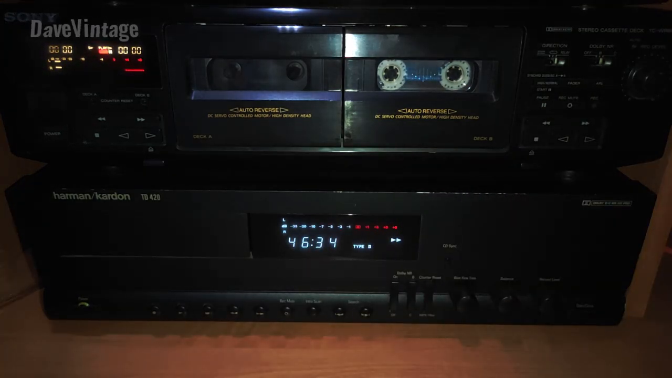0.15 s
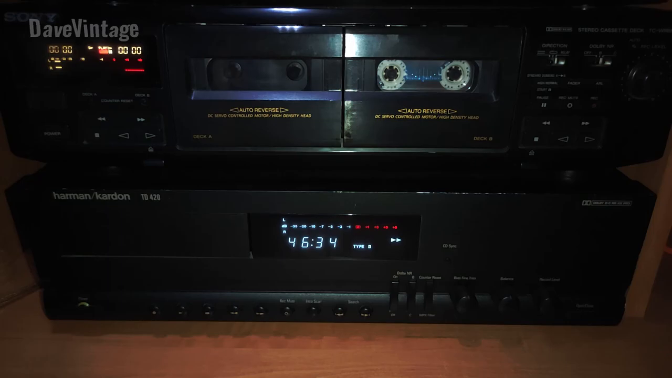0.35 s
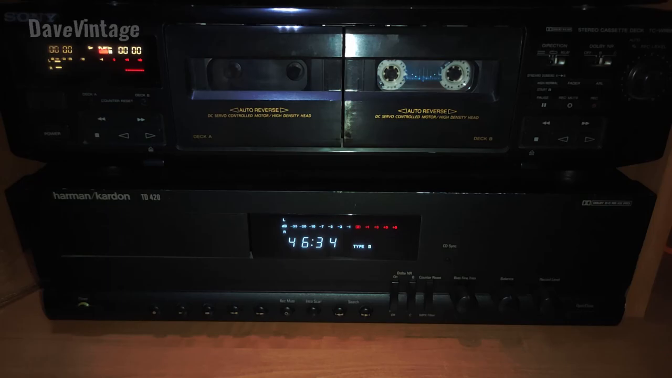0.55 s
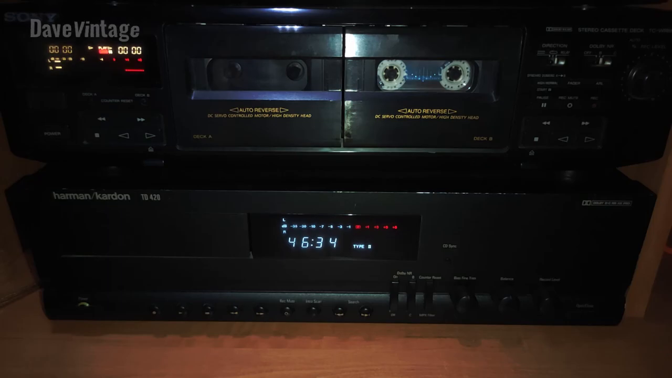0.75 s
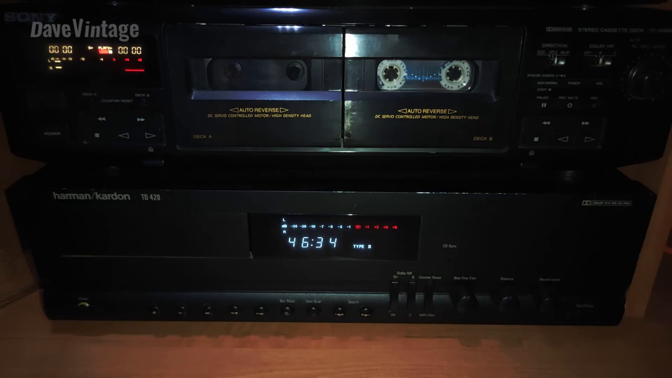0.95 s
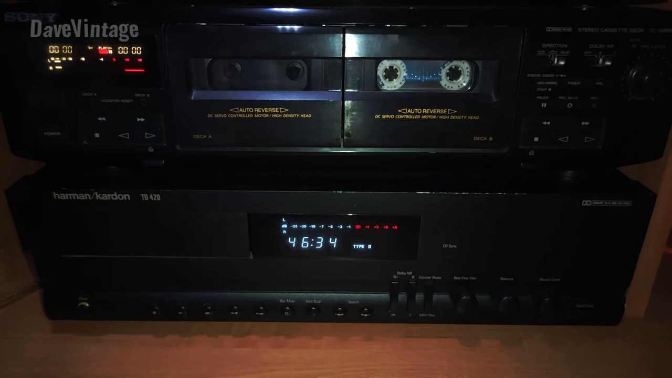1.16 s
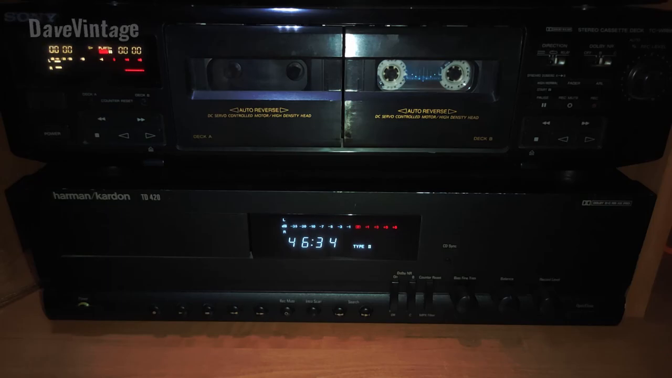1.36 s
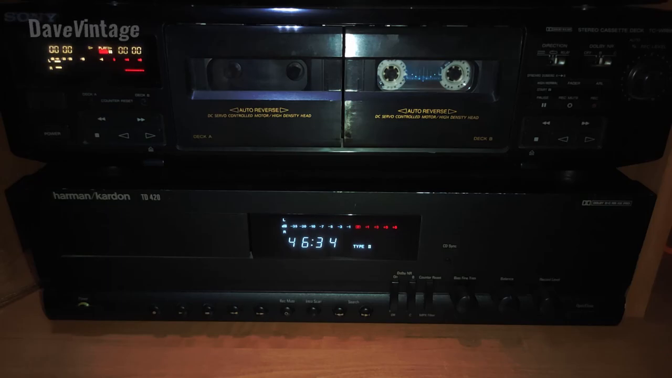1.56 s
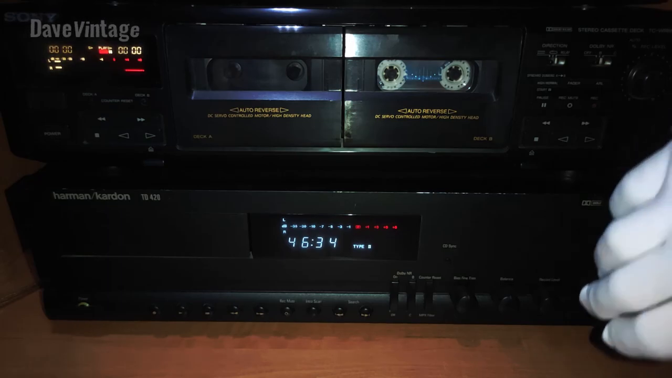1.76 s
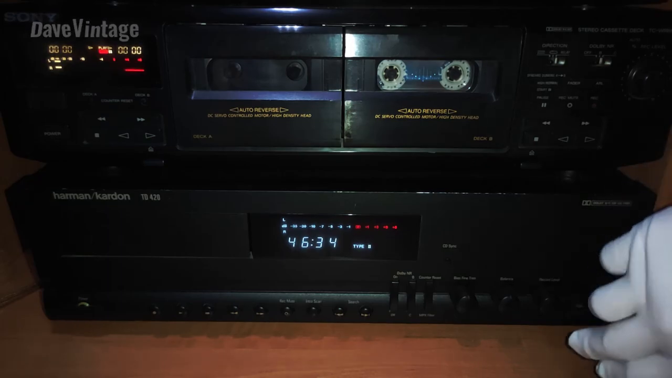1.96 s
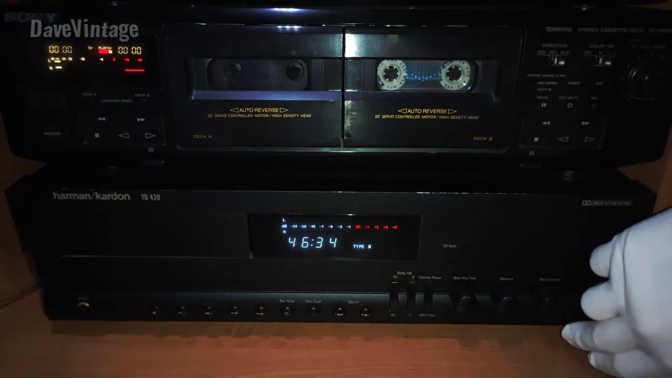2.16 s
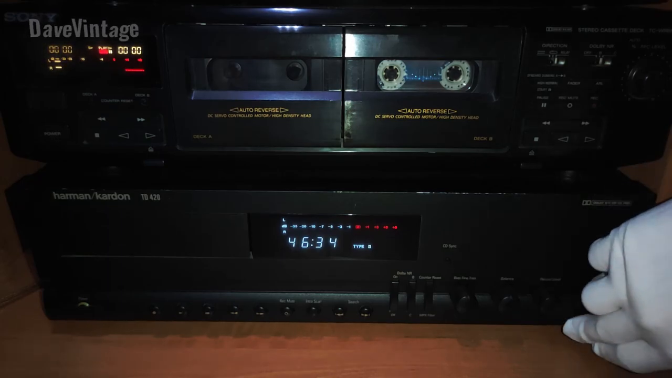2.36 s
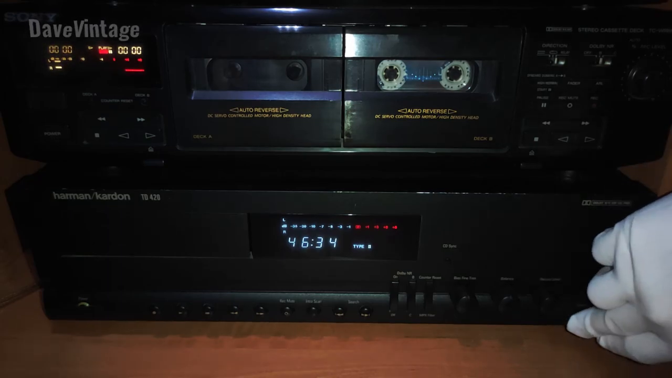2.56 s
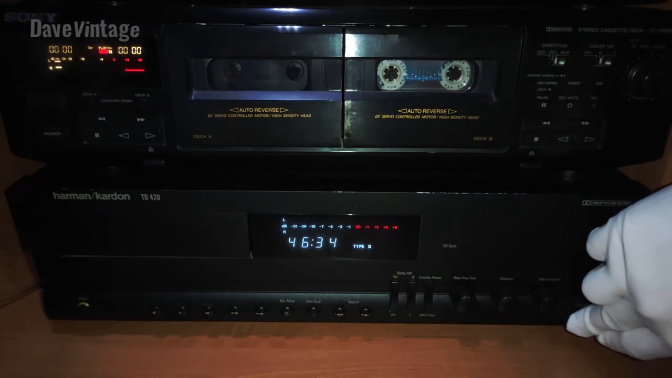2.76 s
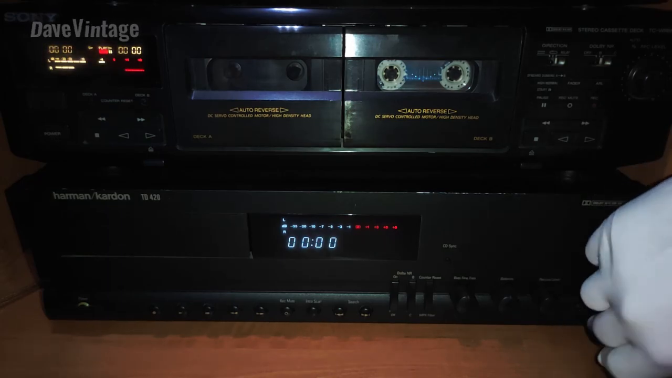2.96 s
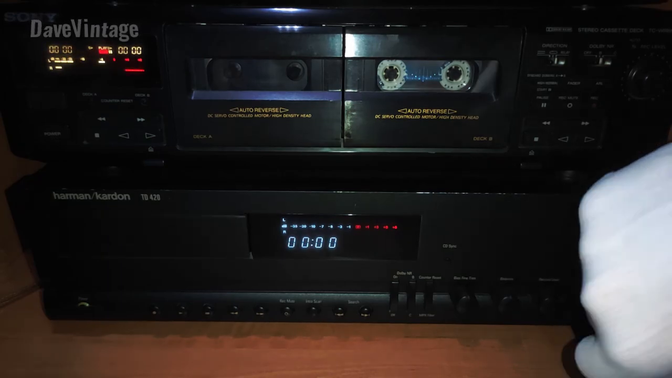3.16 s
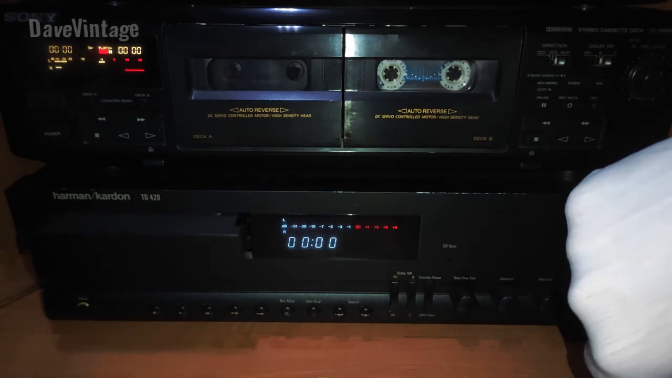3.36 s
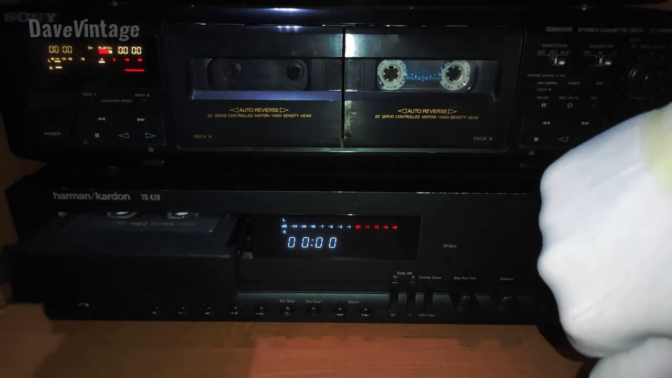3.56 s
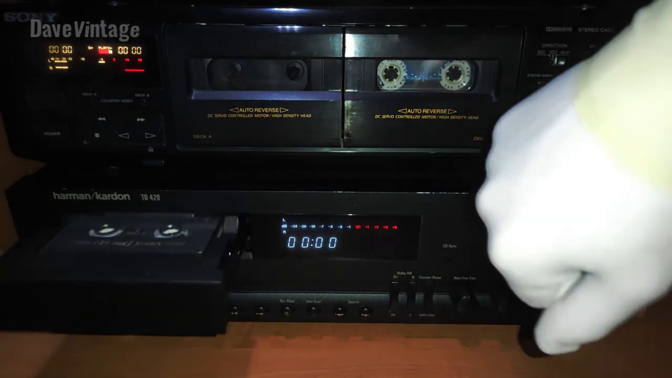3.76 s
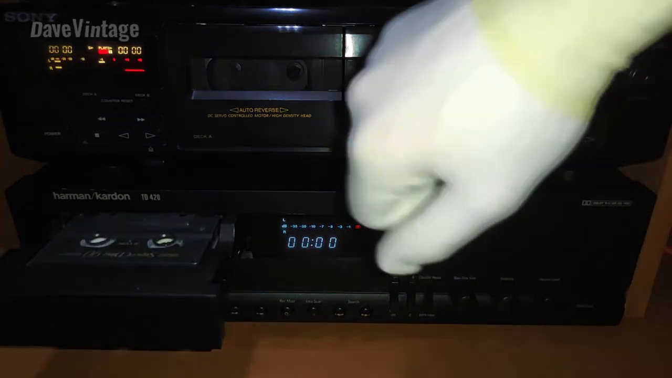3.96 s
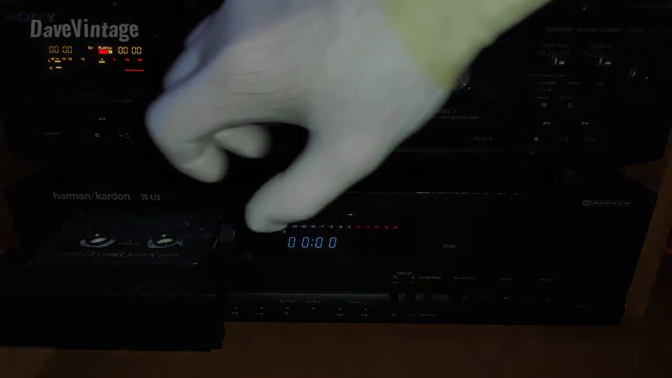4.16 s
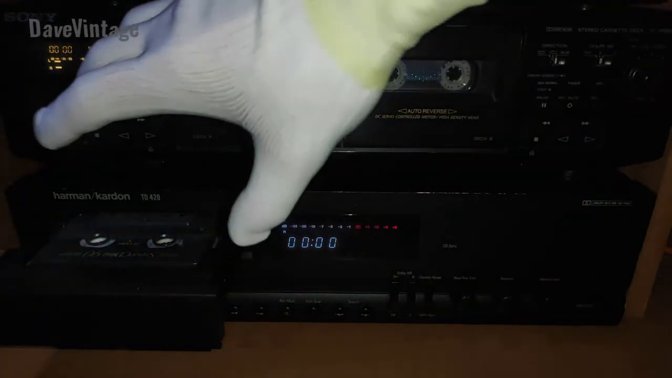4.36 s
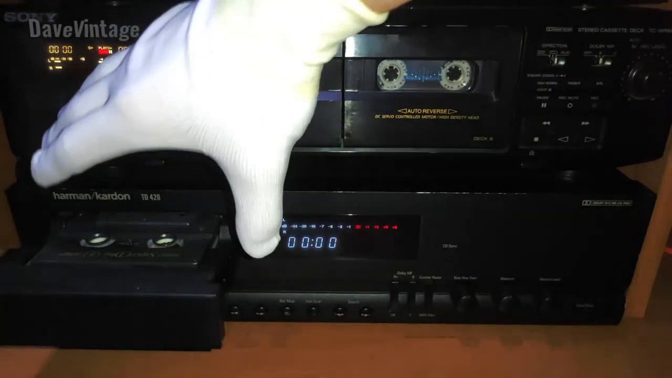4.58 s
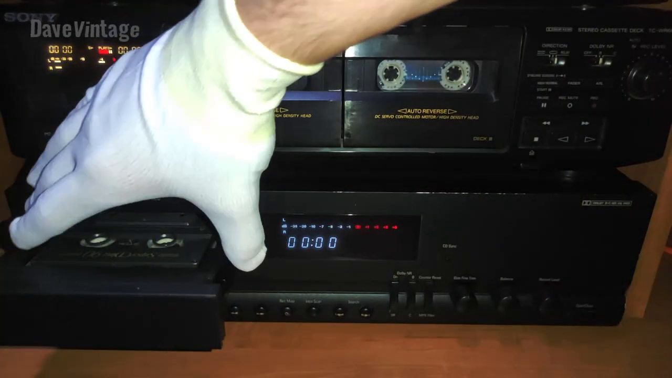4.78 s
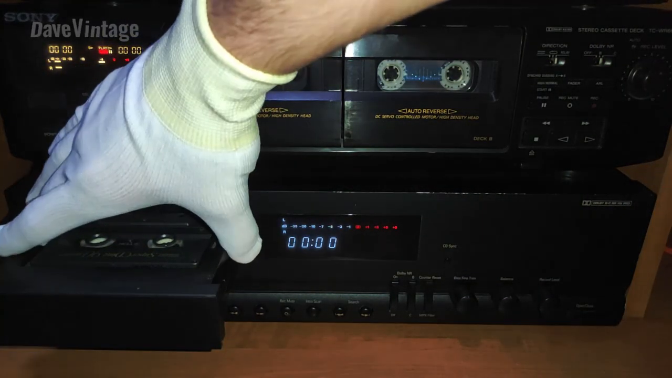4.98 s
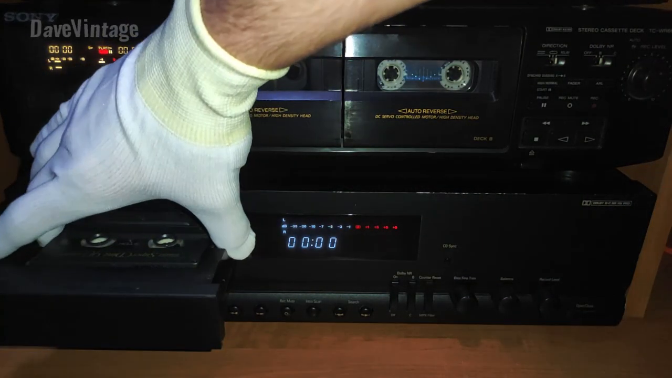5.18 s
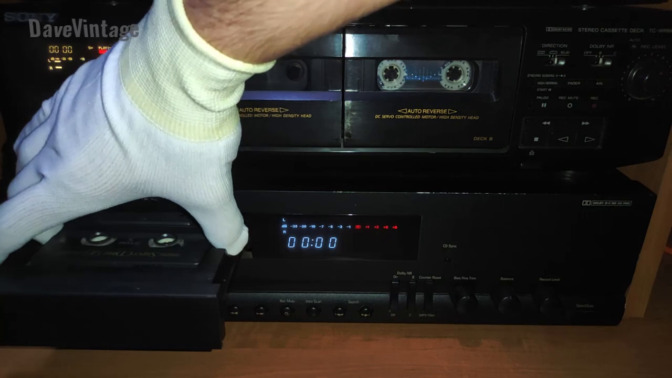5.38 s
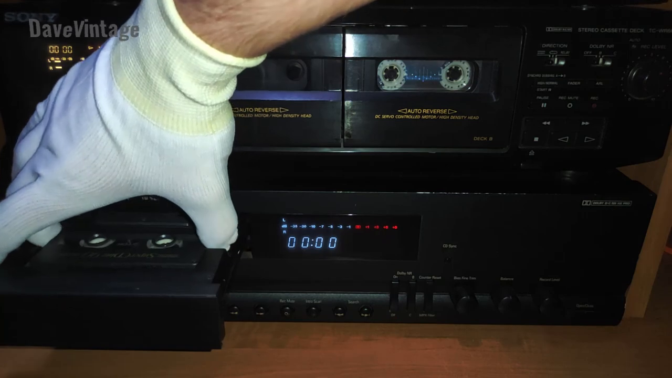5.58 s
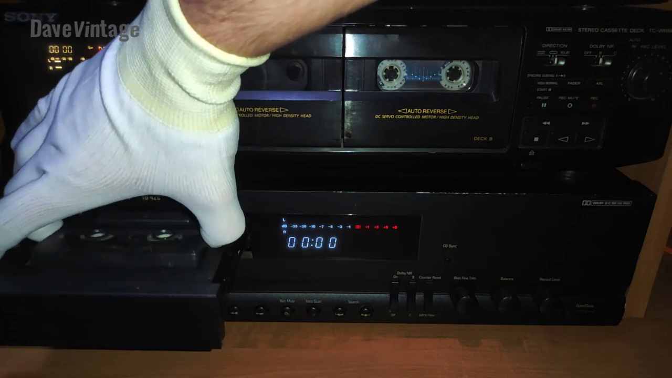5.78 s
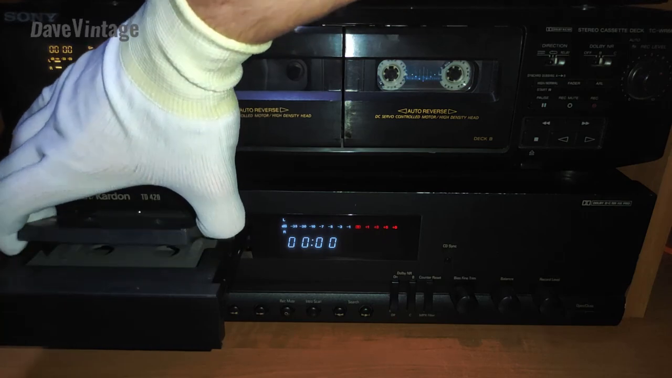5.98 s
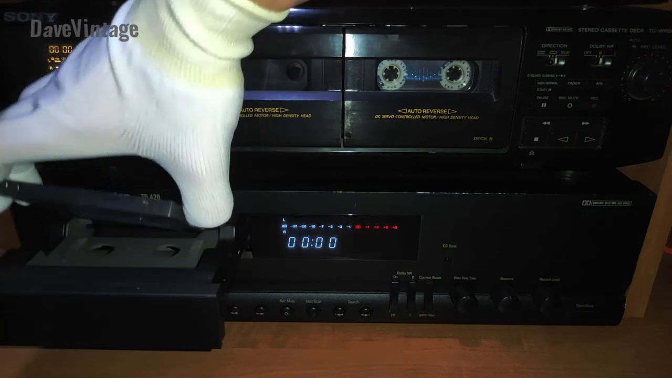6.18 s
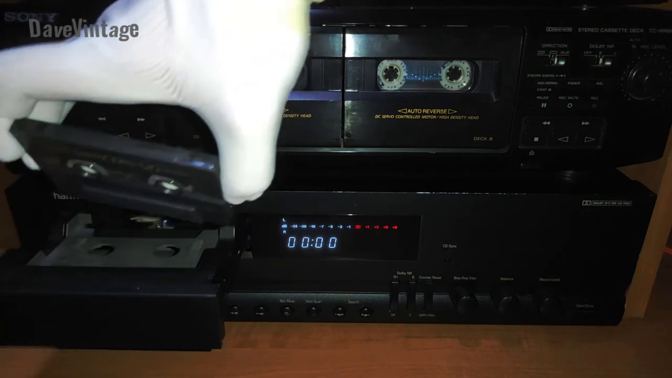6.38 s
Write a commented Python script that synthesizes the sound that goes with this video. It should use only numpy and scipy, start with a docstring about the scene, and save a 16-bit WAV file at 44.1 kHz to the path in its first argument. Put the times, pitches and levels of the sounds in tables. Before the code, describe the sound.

A key click and a short geared whir open a tape deck's tray, followed by glove rustle and the clatter of a cassette being removed.

```python
"""A quiet room hums with a fan and mains, close to a phone-like microphone pair. A tape deck's
mechanism ticks as it settles, and a glove and sleeve start to rustle. Near 3 s a finger presses a key,
the latch springs open and a small geared motor drives the tray out until it hits its stop at 4 s.
Fingertips nudge the cassette and tap the hollow tray; from 5.7 s the hand lifts the cassette out,
scraping and clicking in its clips and knocking against the well."""
import sys
import numpy as np
from scipy import signal
from scipy.fft import rfft, irfft, next_fast_len
from scipy.io import wavfile
from scipy.ndimage import uniform_filter1d

SR = 44100
rng = np.random.default_rng(int(sys.argv[2]) if len(sys.argv) > 2 else 0)


def dump(signal):
    """Clip the signal to [-1, 1] and save it as 16-bit WAV at the path in sys.argv[1]."""
    limited = np.clip(np.atleast_2d(signal).T, -1, 1)
    pcm = np.round(limited * 32767).astype(np.int16)
    wavfile.write(sys.argv[1], SR, pcm)


N = 283589
T = np.arange(N) / SR

# The fan's resonances: pitch_hz, width_hz, level_db
FAN_DRONE = [(709, 20, -74.5), (814, 94, -76), (966, 61, -74), (1106, 29, -75), (1171, 5.8, -71.5),
             (1250, 17, -83.5), (1290, 100, -68), (1411, 16, -75), (1792, 29, -73.5), (5260, 230, -79.5)]
# Mains hum: pitch_hz, steady_db, opening_offset_db, offset_fade_s
MAINS_HUM = [(50.4, -62.5, 6.5, 1.4), (92.3, -66, -1.5, 1.4), (152.5, -73.5, 6.5, 1.58)]
# Glove and sleeve fader: time_s, level_db
RUSTLE_FADER = [(.9, -87), (1.4, -67.5), (1.7, -63.5), (1.95, -71), (2.2, -66.5), (2.8, -71.5), (4.0, -57),
                (4.06, -58), (4.2, -64.5), (4.33, -60.5), (4.4, -58), (4.7, -53), (5.0, -52.5),
                (5.15, -57.5), (5.33, -60.5), (5.47, -59), (5.55, -59.5), (5.9, -61), (6.17, -48.5),
                (6.24, -65), (6.43, -58)]
# Motor faders: time_s, drive_db, rail_hiss_db
MOTOR_FADERS = [(2.9, -62.5, -86), (2.98, -40.5, -52), (3.05, -54, -53), (3.25, -52.5, -66),
                (3.33, -46, -54.5), (3.6, -45, -55.5), (3.65, -45, -50.5), (3.72, -46, -53),
                (3.85, -47.5, -54.5), (4.022, -45.5, -53.5), (4.1, -66.5, -75)]
# Tones of the running drive: pitch_hz, gain_db
WHINE_TONES = [(153, -1), (250, 0.5), (484, 8.5), (699, 10), (939, 7.5), (1012, 5.5), (1102, 3),
               (1366, 4.5), (1990, -6), (2128, -10)]

# Hit cues (positive pan is left): start_s, tick_db, body_db, thud_db, rattle_t60_s, pan_db
SETTLING_HITS = [(0.7738, -56, -53, -64, 0.13, -5), (0.7856, -42.5, -46.5, -61, 0.1, -9.5),
                 (0.7951, -47, -41.5, -62, 0.068, 7), (0.806, -60, -46.5, -64, 0.042, -10),
                 (0.8188, -57, -50.5, -55, 0.15, 1), (0.8891, -58.5, -57, -76, 0.12, -4),
                 (1.259, -52, -57, -66, 0.057, -2.5), (1.649, -50.5, -60, -63, 0.099, 2),
                 (2.503, -55.5, -62, -62.5, 0.088, 1)]
KEY_HITS = [(2.837, -44.5, -35, -66, 0.025, -1), (2.8434, -45.5, -37, -61, 0.02, -2),
            (2.8497, -58, -45, -55, 0.032, -5), (2.8567, -56, -47, -60, 0.035, 6)]
LATCH_HITS = [(2.916, -72, -67, -50, 0.1, 0), (2.9295, -72, -60, -54, 0.053, -6),
              (2.9447, -56.5, -75, -47.5, 0.37, -6), (2.9677, -51, -48, -47, 0.072, -8),
              (2.9645, -49, -60, -44, 0.05, 7), (2.9736, -44, -41, -35.5, 0.023, -6),
              (2.9778, -39, -34, -59, 0.027, 1)]
TRAY_HITS = [(2.9878, -46, -48, -43, 0.2, -2), (2.9995, -49, -52, -42, 0.06, -3),
             (3.009, -52, -48, -43.5, 0.11, -2), (3.046, -56, -48, -52, 0.049, -3),
             (3.0224, -39, -40, -47, 0.054, 4), (3.114, -45.5, -45, -44, 0.076, -2),
             (3.135, -66, -51, -44, 0.066, 1), (3.2146, -52.5, -49.5, -46.5, 0.32, -5),
             (3.251, -40.5, -40, -68, 0.13, -5.5), (3.2606, -59, -40.5, -70, 0.14, 3),
             (3.276, -50, -46, -68, 0.06, 0), (3.2827, -47.5, -72, -37.5, 0.087, -4),
             (3.3353, -51.5, -65, -56, 0.046, -10), (3.6353, -59, -54, -47.5, 0.33, -13),
             (4.0137, -35, -45, -55, 0.038, -3), (4.0235, -43, -46, -42, 0.063, 0)]
NUDGE_HITS = [(4.38, -53, -59, -65, 0.039, 10), (4.5695, -64, -62, -63, 0.019, 5),
              (4.858, -49, -57, -56.5, 0.03, 11), (5.178, -66, -48, -50, 0.043, 0),
              (5.2139, -46, -48, -54, 0.071, -1), (5.3776, -50.5, -51, -51.5, 0.18, -2.5)]
TAP_HITS = [(4.6837, -49, -35.5, -54, 0.072, 0)]
SCRAPE_HITS = [(5.655, -45.5, -44.5, -60, 0.11, -3.5), (5.777, -50, -53, -51.5, 0.039, -3),
               (5.788, -59, -47.5, -62, 0.042, 5), (5.945, -74, -54, -44, 0.23, -3),
               (5.98, -53, -48, -45.5, 0.13, -5), (6.075, -41, -45, -45.5, 0.26, -2.5),
               (6.09, -57, -41, -46, 0.073, 10), (6.107, -36.5, -39, -54, 0.046, -12),
               (6.116, -31, -40, -42, 0.04, 0)]
CLIP_HITS = [(5.667, -54, -44.5, -55, 0.09, 9), (5.6738, -38.5, -38, -48, 0.019, -4),
             (5.685, -64, -47, -44, 0.04, 4), (5.8144, -41, -39, -47.5, 0.075, -2),
             (5.8202, -35, -41.5, -49, 0.044, -5), (5.862, -52.5, -47, -49, 0.11, 1),
             (5.9981, -35, -32.5, -41.5, 0.029, -1.5), (6.0088, -31.5, -36.5, -41.5, 0.091, 2.5),
             (6.0138, -36, -46, -66, 0.014, -12), (6.0192, -40, -48, -40.5, 0.025, 10),
             (6.1243, -25.5, -34, -42.5, 0.023, 2.5), (6.131, -40, -43.5, -65, 0.02, -15),
             (6.1499, -52, -50, -46, 0.043, -4)]
# Single rings of springs, clips and walls: start_s, level_db, pitch_hz, t60_s, pan_db
PING_CUES = [(0.7858, -44, 7200, .015, -4), (0.79, -52, 742, .1, 0), (0.787, -41, 2145, .09, 10),
             (0.7937, -41.5, 4120, 0.056, 0), (0.805, -45, 4145, .03, 0), (5.669, -36.5, 1210, .03, 8),
             (5.672, -38, 1000, 0.042, 0), (5.863, -45, 670, .04, -4), (6.001, -42, 640, .04, 0),
             (6.126, -31, 750, 0.038, 2), (6.154, -35.5, 754, 0.033, 0), (3.254, -46, 4900, 0.046, -9),
             (3.275, -40, 6700, .03, -8), (3.28, -41, 4840, 0.032, -2), (3.281, -40, 3560, 0.022, -2),
             (3.336, -51, 4200, 0.029, 2), (3.632, -39, 620, 0.078, 0), (4.015, -29, 8100, .012, 3),
             (4.026, -34, 495, .05, -1), (4.028, -38, 724, .05, 0), (4.04, -38, 264, .09, 0),
             (4.055, -34, 7230, 0.049, -7.5), (5.66, -40, 7050, .025, -6), (5.674, -37.5, 7090, 0.052, -17),
             (5.697, -43, 7070, .045, -9), (5.718, -56, 7050, 0.035, -4), (5.8203, -32, 6870, 0.029, -12),
             (5.826, -40, 2400, 0.034, 17), (6.0094, -27, 6850, .015, -11),
             (6.013, -21.5, 7150, 0.013, -14), (6.02, -28.5, 7060, .02, -13),
             (6.1105, -32, 7000, .015, -11), (6.125, -18.5, 6730, 0.023, -11),
             (6.125, -16.5, 8610, 0.014, 3)]
# Hard edges meeting: start_s, level_db, pan_db
CRACK_CUES = [(2.974, -50, 0), (2.978, -35, -5), (4.0138, -56, -1), (5.215, -60, -3), (6.1253, -34, 5)]
# Knocks that set a part ringing: start_s, level_db, brightness_db_per_octave
CASE_PUSHES = [(2.976, -40, -6.5), (2.995, -49, -5), (3.13, -49, 17), (3.29, -41, 15.5), (4.043, -37.5, 5),
               (4.079, -38.5, 5), (4.1, -44.5, 4), (5.82, -50, 2)]
TRAY_TAPS = [(4.684, -29, 0)]
WELL_KNOCKS = [(5.948, -41.5, -5), (5.985, -44, 11), (6.005, -37, 10.5), (6.035, -38, 8), (6.075, -41.5, 7),
               (6.115, -34, -1), (6.15, -45, -15.5), (6.165, -51, -2)]

# Ringing modes of those parts: pitch_hz, gain_db, t60_s
CASE_MODES = [(23, -13, 0.061), (38, -4.5, 0.069), (62, 4, 0.041), (97, 3, 0.12), (153.2, -9.5, 0.34),
              (200, -8.5, 0.044), (323, -19.5, 0.036)]
TRAY_MODES = [(1037, 8, 0.031), (770, -2, 0.044), (955, 5.5, 0.031)]
WELL_MODES = [(144, -14.5, 0.24), (260, -1.5, 0.094), (292, -3, 0.07), (704, -17, 0.071)]
# Resonances that give each part its voice: pitch_hz, width_hz, gain_db
PANEL_BODY = [(764, 76, -3.5), (1700, 150, 2), (2080, 93, 3), (2060, 80, 4), (2640, 280, -2),
              (4100, 240, -1), (5570, 920, 0), (3340, 600, -25), (1250, 390, -2), (1010, 550, -9),
              (496, 250, -17)]
SHELF_BODY = [(164, 80, -2), (262, 45, 2), (306, 86, 0.5), (543, 260, 2)]
KEYCAP_BODY = [(680, 41, 2), (1220, 330, 6.5), (1900, 600, -1), (2330, 350, 6), (2630, 430, -2),
               (3200, 540, -18)]
GEARBOX_BODY = [(170, 11, -13), (247, 19, 3), (474.6, 15, 4), (575, 25, -14), (692, 20, -7), (806, 18, -13),
                (945, 29, 1.5), (1094, 19, 6), (1480, 12, -13), (1934, 41, -3), (2137, 15, 4.5),
                (2310, 25, -4), (2660, 28, -1), (2807, 24, -1.5), (2950, 26, -2), (3170, 15, -2)]
CHASSIS_BODY = [(696, 40, 12), (980, 250, -4), (1360, 130, 20), (2180, 1900, 14.5), (2720, 740, -6),
                (4400, 540, 8)]
SHELL_BODY = [(677, 154, 6.5), (1070, 480, 2), (1720, 230, 3), (2390, 71, 0.5), (2850, 1300, -8.5),
              (4120, 520, -6)]
TRAY_BODY = [(1100, 160, 14.5), (1260, 120, -20), (2210, 620, -0.5), (3670, 1400, -3)]

# Tone curves that shape white noise into each texture: frequency_hz, gain_db
AIR_EQ = [(12, -37), (20, 2), (59, -7), (98, -17.5), (157, -17.5), (202, -14), (478, -22.5), (705, -25.5),
          (881, -32.5), (1200, -28), (1540, -33), (1770, -23), (3850, -37.5), (5800, -44), (7520, -31.5),
          (8600, -39), (9600, -42), (15500, -45.5)]
MECHANISM_EQ = [(1760, -26), (3000, 17), (3700, 11), (4180, 15), (5030, 9.5), (5780, 11), (7500, 4),
                (8720, 10), (9630, 1), (12000, -63), (15600, -58), (22000, -120)]
SNAP_EQ = [(8500, -39), (10000, 0), (13000, -5), (15000, -22), (15600, -28)]
CLOTH_EQ = [(400, 0), (880, 2), (1500, -3.5), (1920, -4), (2540, -2), (3030, -6), (4480, -8.5),
            (6000, -4.5), (7400, 2), (8370, 3), (8880, -1.5), (10300, -17), (13900, -19), (15000, -29),
            (15600, -36)]
GRIND_EQ = [(35, -32), (60, 1), (120, -2.5), (249, -5), (382, -13), (477, 4.5), (595, -3), (703, 12),
            (815, -2), (981, 3.5), (1500, -3), (2770, -8), (3300, -22), (5000, -51), (6500, -69),
            (11000, -120)]
RAIL_EQ = [(880, 2), (2000, 1), (3000, 2), (4000, -29), (5800, -5.5), (7600, 1), (8800, -2), (10300, -27),
           (14800, -22), (15600, -37)]
CRACK_EQ = [(800, -23), (2000, -1), (5000, -6), (9000, 11), (12000, 4.5), (15500, -0.5)]
SHELL_EQ = [(1760, -55), (3000, 6.5), (3840, 3.5), (4320, 7), (5960, 2), (6890, 2.5), (7530, -6.5),
            (8760, 2.5), (10300, -15), (11700, -42), (13000, -43), (14100, -43.5), (15500, -42)]

# How alike diffuse sound is in left and right: frequency_hz, likeness_0_to_1
STEREO_LIKENESS = [(40, 0), (130, 0.46), (300, 0.54), (700, 0.26), (1500, 0), (4000, 0)]
# Room decay: frequency_hz, t60_s
ROOM_DECAY = [(100, 0.72), (500, 0.39), (2000, 0.15), (7000, 0.15), (11000, 0.091)]
# Narrow treble resonances of the microphone ports that colour every tick: pitch_hz, width_hz, gain_db
MIC_PORT_RING = [(5430, 230, 7), (6600, 520, -9), (7170, 400, 11.5), (7540, 740, 24), (8750, 67, -26)]
# Balance of the microphone ports: frequency_hz, left_over_right_db
PORT_BALANCE = [(50, 1.5), (150, 3.5), (400, 5.5), (1000, 1.5), (2400, 0), (4500, -1.5), (6000, -3.5),
                (7000, -4.5), (7800, -4.5), (8700, 8.5), (11000, -1.5), (15000, 1)]


def amp(db):
    """Gain of a level in dB."""
    return 10 ** (np.asarray(db) / 20)


def pan(db):
    """Left and right gains, db apart."""
    return amp(np.array([[.5], [-.5]]) * db)


def unit_rms(x):
    """Scales to rms 1."""
    return x / np.sqrt(np.mean(x ** 2) + 1e-20)


def unit_peak(x):
    """Scales so that the loudest 4 ms have rms 1."""
    return x / np.sqrt(uniform_filter1d((x ** 2).mean(0), size=176).max())


def read(points, hz):
    """A frequency curve's value at hz."""
    f, value = np.transpose(points)
    return np.interp(np.log(hz + 1), np.log(f + 1), value)


def add(mix, start_s, sound):
    """Drops a stereo sound into the mix."""
    part = mix[:, round(start_s * SR):][:, :sound.shape[1]]
    part += sound[:, :part.shape[1]]


def equalise(x, eq, gain=amp):
    """Filters by a curve in dB, applied as level or as pan."""
    size = next_fast_len(x.shape[-1])
    response = gain(read(eq, np.fft.rfftfreq(size, 1 / SR)))
    return irfft(rfft(x, size) * response, size)[..., :x.shape[-1]]


def lowpass(x, hz):
    """Rolls off the top at 12 dB per octave."""
    return signal.sosfilt(signal.butter(2, hz, fs=SR, output="sos"), x)


def resonate(x, body):
    """Plays x through parallel resonances."""
    return sum(amp(db) * signal.lfilter(*signal.iirpeak(hz, hz / width, SR), x)
               for hz, width, db in body)


def noise(n, near=0):
    """Stereo white noise: narrow in the bass, narrower for a near source."""
    size = next_fast_len(n)
    left, other = rfft(rng.standard_normal((2, size)))
    likeness = np.clip(read(STEREO_LIKENESS, np.fft.rfftfreq(size, 1 / SR)) + near, 0, 1)
    right = likeness * left + np.sqrt(1 - likeness ** 2) * other
    return irfft(np.array([left, right]), size)[:, :n]


def drift(top_hz):
    """Random wander of rms 1, no faster than top_hz."""
    t = np.linspace(0, T[-1], num=4096)
    rates = np.geomspace(top_hz / 20, top_hz, num=16)
    waves = sum(np.sin(2 * np.pi * (hz * t + rng.random())) / np.sqrt(hz) for hz in rates)
    return np.interp(T, t, unit_rms(waves))


def fader(rows, column=1):
    """Gain ride that fades in, and out again unless it runs to the scene's end."""
    times, levels_db = np.transpose(rows)[[0, column]]
    inside_s = np.minimum(T - times[0], times[-1] - T)
    held = (times[-1] > T[-1] - .1) * (T > times[1])
    return amp(np.interp(T, times, levels_db)) * np.clip(inside_s / 0.027 + held, 0, 1)


def hits(cues, tick_eq, part, rise_s, snap_db, near):
    """Each hit is a dying rattle of contacts that ticks, rings the part and thuds into the shelf."""
    out, t = np.zeros((2, N)), np.arange(8192) / SR
    for start_s, tick_db, body_db, thud_db, t60, pan_db in cues:
        contact = noise(len(t), near)
        spot = [(hz * rng.uniform(0.94, 1.03), width, db + 4.4 * rng.standard_normal())
                for hz, width, db in part]  # no two hits land alike
        fade = amp(-60 * t / t60) * (1 - np.exp(-t / rise_s))
        hiss = equalise(contact, tick_eq) * fade
        tick = unit_peak(unit_peak(hiss) + 2.1 * unit_peak(resonate(hiss, MIC_PORT_RING)))
        snap = unit_peak(equalise(contact, SNAP_EQ) * fade ** 3)  # the top end dies first
        body = unit_peak(lowpass(resonate(contact * fade, spot), hz=5000))
        thud = unit_peak(lowpass(resonate(contact * fade, SHELF_BODY), hz=700))
        click = amp(tick_db) * (tick + amp(snap_db) * snap) + amp(body_db) * body
        add(out, start_s, pan(pan_db) * click + amp(thud_db) * thud)
    return out


def ring_out(knocks, modes, pivot_hz):
    """Each knock rings all modes of a part; a brighter one favours those above the pivot."""
    out, t = np.zeros((2, N)), np.arange(16384) / SR
    attack = -np.minimum(t / 0.0046, 1)  # starts with a drop in pressure
    for start_s, db, brightness in knocks:
        for hz, mode_db, t60 in modes:
            fade = amp(db + mode_db + brightness * np.log2(hz / pivot_hz) - 60 * t / t60)
            tone = np.sin(2 * np.pi * hz * rng.uniform(1.0, 1.01) * t)
            add(out, start_s, pan(0) * attack * fade * tone)
    return out


def room_tone():
    """The bed: air noise, a fan's drone and wavering mains hum."""
    bed = amp(-59) * unit_rms(equalise(noise(N), AIR_EQ))
    for hz, width, db in FAN_DRONE:
        bed += amp(db) * unit_rms(resonate(noise(N, near=0.035), [(hz, width, 0)]))
    for hz, steady_db, offset_db, fade_s in MAINS_HUM:
        level_db = steady_db + offset_db * np.exp(-(T / fade_s) ** 4) + 2.1 * drift(15)
        bed += amp(level_db) * np.sin(2 * np.pi * (hz * T + 0.12 * drift(4.3)))
    return bed


def settling_ticks():
    """The mechanism settles, ticking into the panel."""
    return hits(SETTLING_HITS, MECHANISM_EQ, PANEL_BODY, rise_s=0.0011, snap_db=-28, near=0.38)


def pings():
    """Springs, clips and plastic walls each ring at a single pitch."""
    out, t = np.zeros((2, N)), np.arange(4096) / SR
    for start_s, db, hz, t60, pan_db in PING_CUES:
        fade = amp(db - 60 * t / t60) * np.minimum(t / 0.00063, 1)
        add(out, start_s, pan(pan_db) * fade * np.sin(2 * np.pi * hz * t))
    return out


def glove_rustle():
    """Cloth rubs: a flickering hiss with about 600 tiny fibre snaps a second."""
    snaps = amp(2.0 * np.minimum(rng.exponential(1, N), 3.5)) * (rng.random(N) < 600 / SR)
    fibres = noise(N) * amp(1.2 * drift(150)) + 0.13 * unit_rms(snaps)
    return unit_rms(equalise(fibres, CLOTH_EQ)) * fader(RUSTLE_FADER)


def key_press():
    """The key cap clicks sharply under the finger."""
    return hits(KEY_HITS, MECHANISM_EQ, KEYCAP_BODY, rise_s=0.00023, snap_db=-25, near=0.15)


def tray_motor(mesh_hz=234.7, wander=0.025, rumble_hz=92.4):
    """Uneven teeth pulse into the gearbox, over whine, grind, a shaking case and hissing rails."""
    tooth_count = np.cumsum(mesh_hz * (1 + wander * drift(30))) / SR
    teeth = np.diff(np.floor(tooth_count), prepend=0) * amp(3.2 * rng.standard_normal(N))
    rough = noise(N, near=0.32)
    whir = unit_rms(resonate(unit_rms(teeth) + 1.5 * rough, GEARBOX_BODY))
    whine = unit_rms(sum(amp(db + 4.7 * drift(120)) * np.sin(2 * np.pi * hz * T + 1.73 * drift(18))
                         for hz, db in WHINE_TONES))
    grind = unit_rms(equalise(rough, GRIND_EQ))
    rails = unit_rms(equalise(noise(N, near=0.034), RAIL_EQ)) * fader(MOTOR_FADERS, column=2)
    flutter = amp(0.8 * drift(300))  # the load on the gears is uneven
    moving = np.clip((T - 3.3) / 0.053, 0, 1)  # whine and rumble enter once the tray moves
    rumble = amp(-11.5 + 1.8 * drift(6.4)) * np.sin(2 * np.pi * rumble_hz * T + 0.99 * drift(4.5))
    drive = 0.47 * whir + (0.76 * whine + rumble) * moving + grind
    return drive * fader(MOTOR_FADERS) * flutter + rails


def latch_release():
    """The latch springs open and rings the chassis."""
    return hits(LATCH_HITS, MECHANISM_EQ, CHASSIS_BODY, rise_s=0.001, snap_db=-14, near=0.39)


def edge_cracks(t60_s=0.008):
    """Hard edges meet in bare, bright bursts of noise."""
    out, t = np.zeros((2, N)), np.arange(1024) / SR
    for start_s, db, pan_db in CRACK_CUES:
        burst = equalise(noise(len(t), near=0.26), CRACK_EQ) * amp(-60 * t / t60_s)
        add(out, start_s, amp(db) * pan(pan_db) * unit_peak(burst))
    return out


def case_thumps():
    """The tray pushes the case, which rings low."""
    return ring_out(CASE_PUSHES, CASE_MODES, pivot_hz=100)


def tray_knocks():
    """The tray knocks in its gears and against its end stop."""
    return hits(TRAY_HITS, MECHANISM_EQ, CHASSIS_BODY, rise_s=0.00092, snap_db=-22, near=0.48)


def grip_nudges():
    """Fingertips nudge the cassette shell as they find a grip."""
    return hits(NUDGE_HITS, SHELL_EQ, SHELL_BODY, rise_s=0.001, snap_db=-25, near=0.38)


def tray_tap():
    """A fingertip taps the hollow tray once and it rings briefly."""
    tap = hits(TAP_HITS, MECHANISM_EQ, TRAY_BODY, rise_s=0.00081, snap_db=-15, near=0.19)
    return tap + ring_out(TRAY_TAPS, TRAY_MODES, pivot_hz=800)


def shell_scrapes():
    """The shell drags against its clips with a soft attack."""
    return hits(SCRAPE_HITS, SHELL_EQ, SHELL_BODY, rise_s=0.0055, snap_db=-21, near=0.6)


def clip_clicks():
    """The cassette clicks in its clips, ringing its shell."""
    return hits(CLIP_HITS, SHELL_EQ, SHELL_BODY, rise_s=0.00087, snap_db=-46, near=0.47)


def well_knocks():
    """The cassette knocks the hollow well on its way out."""
    return ring_out(WELL_KNOCKS, WELL_MODES, pivot_hz=259)


def room_reverb(send):
    """A diffuse stereo tail after a 6 ms gap; the bass hangs on longest."""
    hz, t, bands = signal.stft(noise(SR // 2), SR, nperseg=256)
    decay = amp(-60 * t / read(ROOM_DECAY, hz)[:, None]) * (t > .006)
    tail = signal.istft(bands * decay, SR, nperseg=256)[1]
    return signal.fftconvolve(send, tail / np.linalg.norm(tail[0]), axes=1)[:, :N]


def scene():
    """Hits and drier accents feed the room; motor, cloth and room tone stay dry."""
    clatter = settling_ticks() + key_press() + latch_release() + tray_knocks()
    clatter += clip_clicks() + shell_scrapes() + grip_nudges()
    accents = tray_tap() + pings() + edge_cracks() + case_thumps() + well_knocks()
    reverb = room_reverb(amp(-9.5) * clatter + amp(-15.5) * accents)
    deck = clatter + accents + reverb + tray_motor()
    deck[0] = np.roll(deck[0], 9)  # reaches the left port 9 samples late
    return deck + glove_rustle() + room_tone()


def record(dry):
    """The two microphone ports resonate differently, tilting the balance; then a steep high cut."""
    ports = equalise(dry, PORT_BALANCE, gain=pan)
    high_cut = signal.firwin(511, 15660, window=("kaiser", 9), fs=SR)
    return signal.oaconvolve(ports, high_cut[None], "same")


dry = scene()
out = record(dry)
dump(out)
```